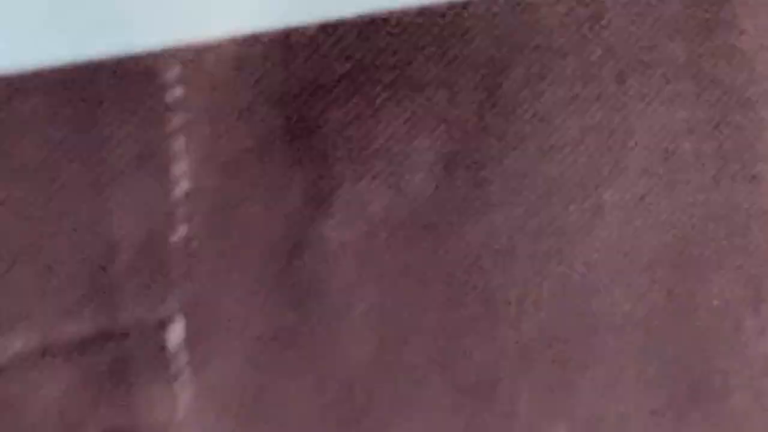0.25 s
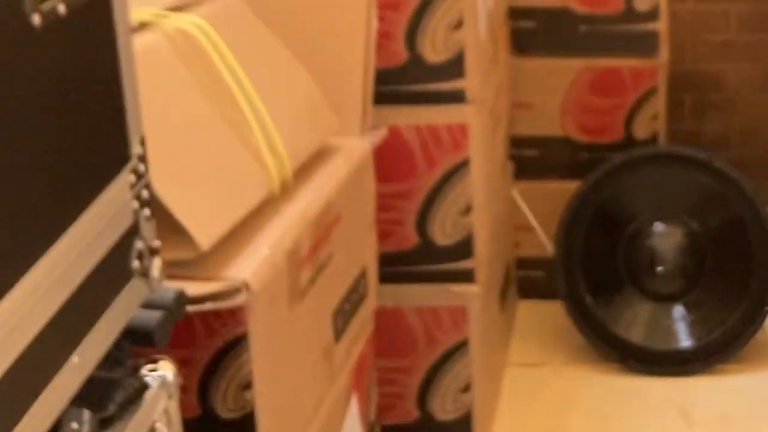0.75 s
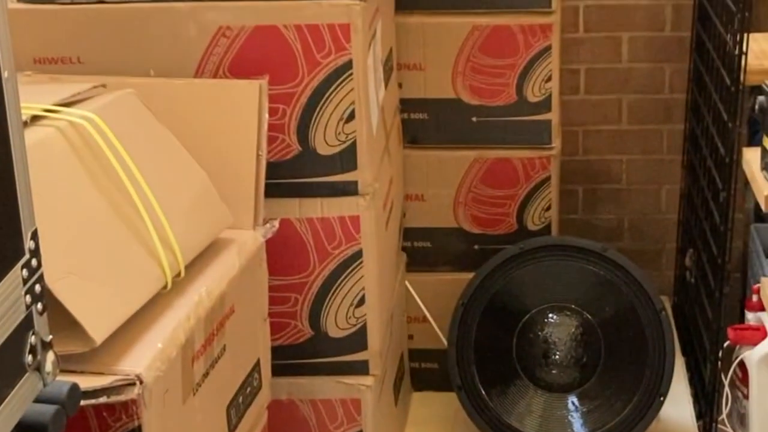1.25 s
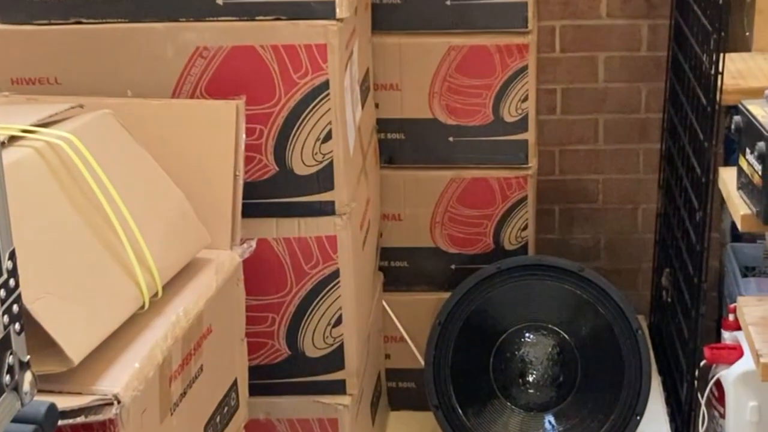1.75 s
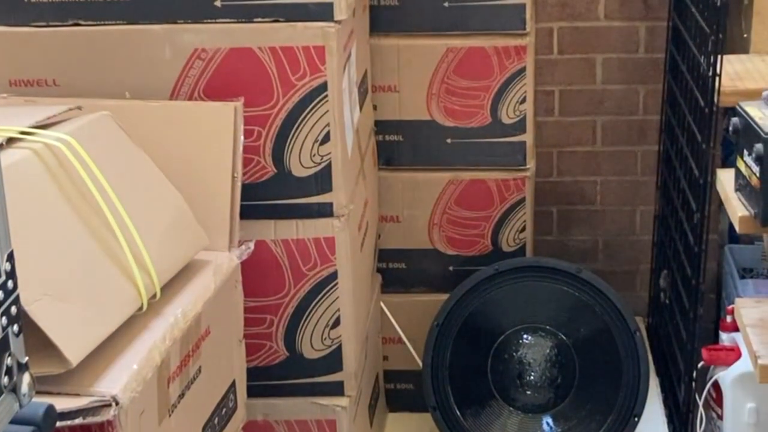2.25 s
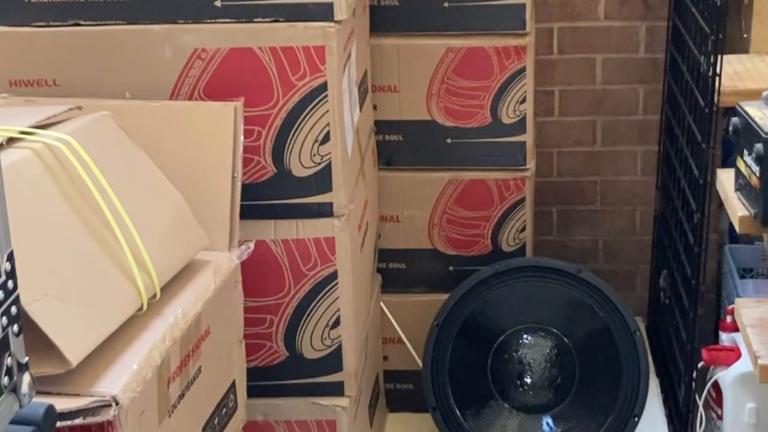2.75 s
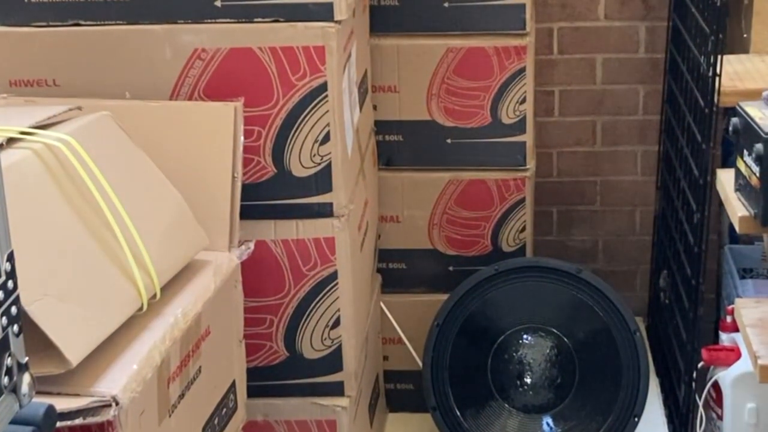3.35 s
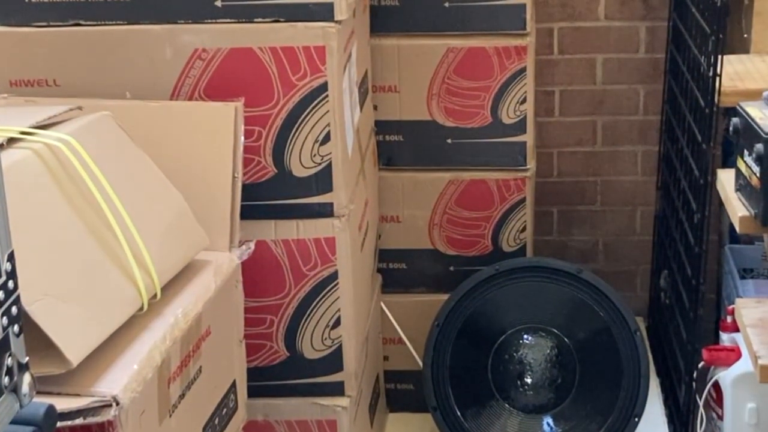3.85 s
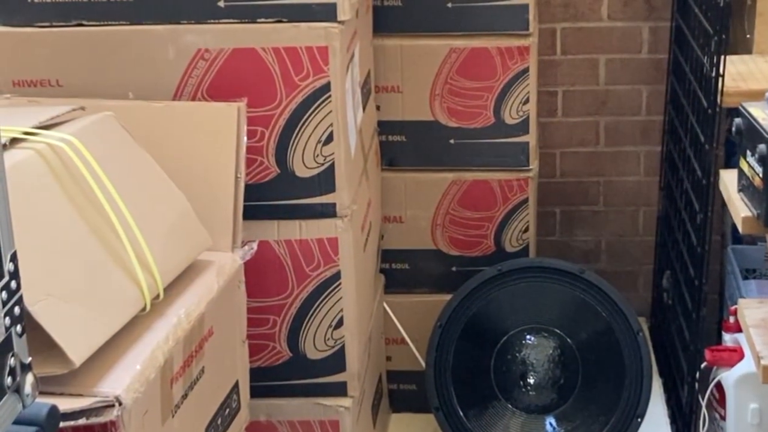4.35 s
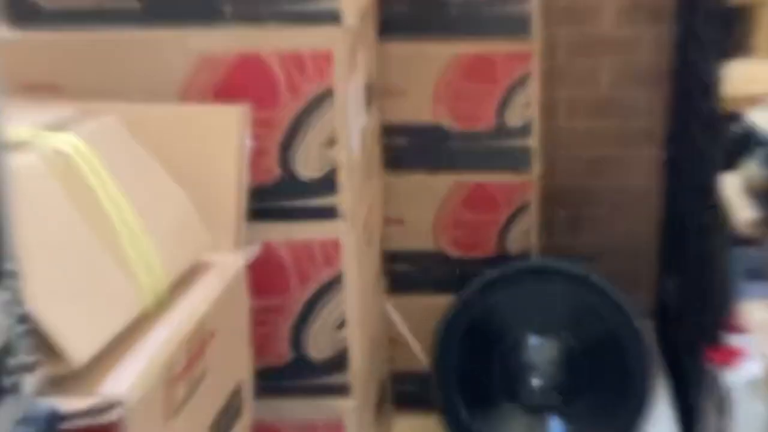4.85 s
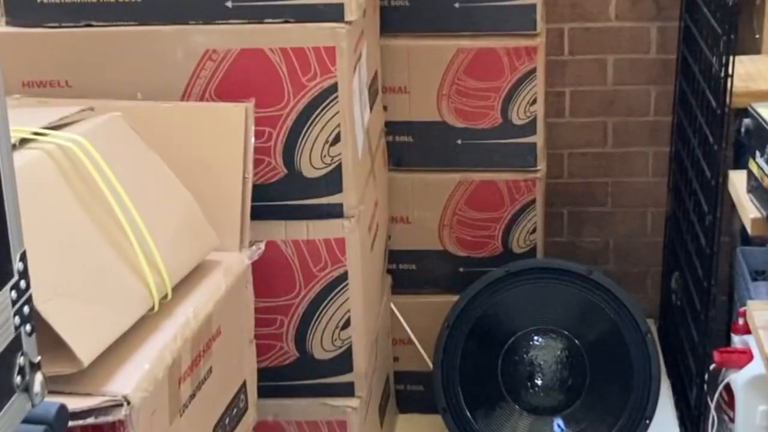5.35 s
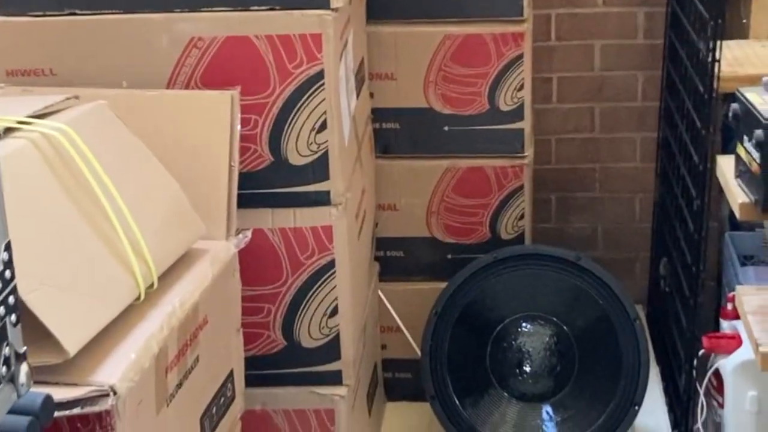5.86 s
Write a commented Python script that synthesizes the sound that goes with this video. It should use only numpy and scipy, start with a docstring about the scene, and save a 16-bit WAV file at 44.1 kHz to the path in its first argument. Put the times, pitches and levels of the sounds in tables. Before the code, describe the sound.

Clothing rubs close to the microphone of a hand-held phone from the start, in uneven swishes with a fine fizz and low drag, over a faint room rumble. At about 0.5 seconds comes a quick cluster of hollow knocks on cardboard boxes, with soft bumps. At 1.3 seconds a hard catch clicks sharply with a brief ring, followed at once by strong, low thumps of the hand on the phone until 1.6 seconds. Rustling, lighter knocks, bumps and small clicks continue and die away by about 3.3 seconds. Then only the quiet rumble and a thin hiss remain. At 4.8 seconds the grip shifts: a short rasp of skin, a few bright, dry ticks from the case and a run of dull thumps that fade by 5.3 seconds. A couple of very faint knocks and clicks come near 6 seconds. The storeroom sounds small, with short echoes.

```python
"""Phone carried through a storeroom

Clothing rubs close to the two microphones of a hand-held phone, over a faint room rumble. The hand
thumps the phone and rocks it, knocks ring hollow among stacked boxes, and a hard catch clicks
sharply. Later the grip shifts with a rasp of skin and a few dry ticks from the case."""
import sys
import numpy as np
from scipy import signal
from scipy.fft import rfft, irfft, next_fast_len
from scipy.io import wavfile
from scipy.ndimage import uniform_filter1d, map_coordinates

SR = 44100
rng = np.random.default_rng(int(sys.argv[2]) if len(sys.argv) > 2 else 0)


def store_pcm(level_fs):
    """Save levels as 16-bit WAV."""
    pcm = np.round(np.clip(level_fs, -1, 1) * 32767).astype(np.int16)
    wavfile.write(sys.argv[1], SR, np.atleast_2d(pcm).T)


N = 268569
T = np.arange(SR * 3 // 4) / SR  # time within one impact, s


def amp(db):
    """Decibels to gain."""
    return 10 ** (np.asarray(db) / 20)


def unit(x):
    """x at rms 1."""
    return x / np.sqrt(np.mean(x ** 2) + 1e-20)


def burst(x, seconds):
    """x with the energy of rms 1 held for this long."""
    return unit(x) * np.sqrt(seconds * SR / x.shape[-1])


def fade(t, t60):
    """Exponential decay, 60 dB in t60."""
    return np.exp(-np.log(1000) * t / t60)


def along(points, hz):
    """(f, value) points interpolated over log frequency."""
    f, v = np.transpose(points)
    return np.interp(np.log(hz + 1), np.log(f + 1), v)


def shape(points):
    """Gain curve through (f/Hz, level/dB) points."""
    return lambda hz: amp(along(points, hz))


def wobble(rate_hz):
    """Smooth random curve, rate_hz knots a second."""
    knots = rng.standard_normal(int(N * rate_hz / SR) + 4)
    return map_coordinates(knots, [np.arange(N) * rate_hz / SR])


def add(track, start_s, x):
    """Mix x into the track."""
    part = track[:, round(start_s * SR):][:, :x.shape[-1]]
    part += x[..., :part.shape[-1]]


def filtered(x, gain):
    """Zero-phase filter with this gain curve."""
    n = x.shape[-1]
    size = next_fast_len(n + SR // 4)
    return irfft(rfft(x, size) * gain(np.fft.rfftfreq(size, 1 / SR)), size)[..., :n]


def coloured(x, gain, size=16384):
    """Minimum-phase filter with this gain curve."""
    cepstrum = irfft(np.log(gain(np.fft.rfftfreq(size, 1 / SR)) + 1e-6))
    cepstrum[1:size // 2] *= 2
    cepstrum[size // 2 + 1:] = 0
    impulse = irfft(np.exp(rfft(cepstrum)))
    return signal.fftconvolve(x, impulse[None], axes=1)[:, :x.shape[1]]


def lagged(x, lag_samples):
    """x at the left microphone, then later at the right."""
    return np.array([x, np.pad(x, (lag_samples, 0))[:len(x)]])


def direct(lag_samples):
    """Unit impulse arriving from the left."""
    return lagged(signal.unit_impulse(len(T)), lag_samples)


# Bearing of cloth and knocks: t/s, side (0 left, 1 right)
BEARING = [(2.0, 0), (2.3, 1)]

def from_side(pair, time_s):
    """Turn a left-leading pair to its bearing at time_s."""
    turn = np.interp(time_s, *np.transpose(BEARING)) * np.pi / 2
    return np.cos(turn) * pair + np.sin(turn) * pair[::-1]


# Diffuse field: f/Hz, left-right correlation
COHERENCE = [(100, .99), (160, .94), (280, .72), (560, .42), (1100, -.25), (2200, -.1), (4500, 0),
             (12000, 0)]

def diffuse(n):
    """Noise at two microphones: alike in the bass, unrelated in the treble."""
    def mid_side_gains(hz):
        turn = np.arccos(np.clip(along(COHERENCE, hz), -1, 1)) / 2
        return np.array([np.cos(turn), np.sin(turn)])

    mid, side = filtered(rng.standard_normal((2, n)), mid_side_gains)
    return np.array([mid + side, mid - side])


# Room decay: f/Hz, t60/s
ROOM_DECAY = [(100, 0.46), (260, 0.2), (700, 0.12), (2000, 0.49), (5000, 0.47), (14000, 0.067)]

def echoes(early_t60_s, late_db):
    """Random room response of energy 1: close walls, then a tail."""
    noise = diffuse(len(T))
    hz, t, spectra = signal.stft(noise, SR, nperseg=256)
    decay = fade(t, along(ROOM_DECAY, hz)[:, None])
    tail = signal.istft(spectra * decay, SR, nperseg=256)[1][:, :len(T)]
    return burst(noise * fade(T, early_t60_s) + amp(late_db) * tail, 1 / SR)


def mode(hz, t60_s, spread_cycles):
    """Decaying sine, its phase scattered between the microphones."""
    cycles = hz * T + rng.random() + rng.normal(0, spread_cycles, (2, 1))
    return fade(T, t60_s) * np.sin(2 * np.pi * cycles)


def mottled(x, depth_db):
    """Lift and shade random time-frequency patches of x."""
    spectra = signal.stft(x, nperseg=512)[2]
    patches = uniform_filter1d(rng.standard_normal(spectra.shape[1:]), size=7, axis=0)
    patches = uniform_filter1d(patches, size=30, axis=1)
    return signal.istft(spectra * amp(depth_db * unit(patches)), nperseg=512)[1][:, :N]


def stroke(start_s, length_s, t60_s, exponent, rise_share=0.33):
    """Envelope of one rub, speed ** exponent: it speeds up, slides on and dies away."""
    t = np.arange(N) / SR - start_s
    speed = np.sin(np.pi / 2 * np.clip(t / (rise_share * length_s), 0, 1)) ** 2
    return speed ** exponent * fade(np.maximum(t - length_s, 0), t60_s)


# Cloth strokes: t/s, length/s, release t60/s, swish level/dB, fizz level/dB, drag level/dB
STROKES = [(-0.18, 0.36, 0.45, -58.5, -64, -56), (0.16, 0.22, 0.97, -70, -74.5, -60),
           (0.448, 0.1, 0.3, -58, -71.5, -46.5), (0.586, 0.096, 0.33, -59.5, -67, -46),
           (0.926, 0.42, .4, -77, -76.5, -75.5), (1.068, 0.4, 0.27, -64, -59.5, -64),
           (1.265, .15, 0.13, -53.5, -56.5, -49), (1.424, 0.07, 0.52, -59, -63.5, -50),
           (1.515, 0.47, 0.64, -65, -66.5, -61.5), (1.804, 0.15, 0.23, -60, -61, -63),
           (1.983, 0.13, 0.33, -75, -88, -60.5), (2.254, 0.1, 0.47, -69.5, -74.5, -52),
           (2.395, 0.037, 0.34, -60, -65, -65), (2.415, 0.31, 0.57, -72.5, -91, -60),
           (2.75, 0.042, 0.3, -57.5, -66.5, -47.5), (2.788, 0.13, 0.48, -71, -97, -56.5),
           (2.968, 0.18, 0.27, -64, -78.5, -66.5), (3.046, 0.245, 0.24, -62.5, -74.5, -66)]
# Friction spectra: f/Hz, level/dB
SWISH_SPECTRUM = [(150, -1.5), (500, 1), (1000, 4), (1700, 11.5), (2500, 9), (3400, 5), (4500, 5),
                  (5600, 1), (7500, 3.5), (11000, -28.5), (15500, -23.5), (17000, -33.5)]
FIZZ_SPECTRUM = [(3000, -30), (7000, -10), (11000, 4.5), (15500, -7), (17000, -31)]
DRAG_SPECTRUM = [(30, -5.5), (70, 7.5), (130, -10), (205, 2.5), (260, -5), (370, -0.5), (520, -8.5),
                 (750, -8.5), (1200, -12), (2500, -47.5)]
CARDBOARD_SPECTRUM = [(150, -20), (280, -5.5), (355, 2), (450, -5.5), (510, -3.5), (620, -19.5),
                      (740, -14.5), (950, -21.5), (2000, -47)]

def cloth(grain_db=1.5, near_db=-3, fizz_near_db=4):
    """Fabric slides on fabric with a swish, fine fizz and low drag; once it brushes hollow cardboard."""
    starts, lengths, releases, swish_db, fizz_db, drag_db = np.transpose(STROKES)

    def rubbing(levels_db, exponent):
        """Envelope of all strokes, summed in power."""
        rows = zip(levels_db, starts, lengths, releases)
        return np.sqrt(sum((amp(db) * stroke(*timing, exponent)) ** 2 for db, *timing in rows))

    def fibres(spectrum, fine=False):
        """Catching threads, direct plus diffuse; the finest come from the right."""
        near = lagged(rng.standard_normal(N), lag_samples=12)
        if fine:
            near = amp(fizz_near_db) * near[::-1]
        else:
            near = amp(near_db) * from_side(near, np.arange(N) / SR)
        grainy = (diffuse(N) + near) * amp(grain_db * wobble(1000))
        return unit(coloured(grainy, shape(spectrum)))

    swish = rubbing(swish_db, exponent=0.55) * amp(wobble(26))
    swish = swish * mottled(fibres(SWISH_SPECTRUM), depth_db=2.6)  # shifting folds
    fizz = rubbing(fizz_db, exponent=0.75) * amp(0.33 * wobble(22)) * fibres(FIZZ_SPECTRUM, fine=True)
    drag = rubbing(drag_db, exponent=0.5) * amp(1.5 * wobble(25)) * fibres(DRAG_SPECTRUM)
    brush = amp(-55.5) * stroke(start_s=-0.042, length_s=0.29, t60_s=0.32, exponent=0.5)
    return swish + fizz + drag + brush * fibres(CARDBOARD_SPECTRUM)


# Building rumble: f/Hz, level/dB
RUMBLE_SPECTRUM = [(20, -17), (48, -1), (70, 0), (125, -6), (165, -4), (210, -6), (270, -11.5), (380, -12),
                   (520, -15.5), (800, -20.5), (1300, -24.5), (2500, -27.5), (5000, -32.5), (16000, -48)]

def room_tone(rumble_db=-69, hiss_db=-87):
    """Faint, unsteady rumble of the building and a thin hiss."""
    rumble_gain = amp(rumble_db + 1.3 * wobble(7))
    rumble = mottled(coloured(diffuse(N), shape(RUMBLE_SPECTRUM)), depth_db=1.8)
    hiss = coloured(diffuse(N), shape([(3000, -20), (8000, -1), (11500, 0), (16000, -14)]))
    return rumble_gain * unit(rumble) + amp(hiss_db) * unit(hiss)


# Hand on phone: t/s, level/dB, swing f/Hz, relative body ring/dB
THUMPS = [(0.148, -56, 82, -20), (0.562, -38, 81, -18), (0.604, -39.5, 81.5, -20), (1.3125, -26, 82, -26),
          (1.385, -28.5, 80, -14), (1.502, -27, 84.3, -15.5), (1.56, -37, 82, -22), (1.932, -47, 83, -3),
          (2.012, -45, 81, -3), (2.462, -47, 80, -14), (2.492, -46, 82, -14), (2.763, -41, 86.5, -22),
          (2.874, -47.5, 82.9, -32), (4.798, -31, 79.5, -8), (4.831, -34.5, 79.6, -12),
          (4.862, -38, 79.5, -23.5), (4.922, -46, 85, -19), (5.001, -48.5, 80, -14.5),
          (5.311, -53, 77.8, -25.5)]
# Low shudder of a thump: f/Hz, level/dB
SHUDDER_SPECTRUM = [(25, -32), (60, 0.5), (100, -3.5), (200, -17), (500, -43.5), (1500, -81.5)]

def thumps(rebounds=3, rebound_s=0.05, loss_db=8.5, grip_scatter=0.024, body_hz=276):
    """A soft push rocks the phone in the hand, with ever weaker rebounds; its body hums briefly."""
    out = np.zeros((2, N))
    push = 1 - np.exp(-(T / 0.008) ** 2)
    swing = push * fade(T, 0.075)
    for start_s, db, swing_hz, ring_db in THUMPS:
        for k in range(1 + rebounds):
            hz = swing_hz * np.exp(grip_scatter * rng.standard_normal())  # grip firmness varies
            rock = swing / swing.max() * np.sin(2 * np.pi * hz * T)
            add(out, start_s + k * rebound_s, amp(db - k * loss_db) * rock)
        shudder = coloured(echoes(early_t60_s=0.14, late_db=-11), shape(SHUDDER_SPECTRUM))
        ring = push * fade(T, 0.2) * np.sin(2 * np.pi * (body_hz * T + rng.random()))
        add(out, start_s, amp(db) * (burst(shudder, 0.0012) + amp(ring_db) * ring))
    return out


def contact_band(centre_hz, above_oct=0.58, below_oct=1.3):
    """Gain curve of a soft blow: little lies far above its centre frequency."""
    def gain(hz):
        octaves = np.log2((hz + 1) / centre_hz)
        return np.exp(-0.5 * (octaves / np.where(hz > centre_hz, above_oct, below_oct)) ** 2)

    return gain


# Blows on boxes: t/s, level/dB, centre f/Hz, relative boom/dB, relative edge/dB, left minus right/dB
KNOCKS = [(0.407, -57, 1020, -3, -13, -3), (0.4548, -30.5, 556, -8.5, -23, -0.5),
          (0.4614, -39, 462, 13.5, -26, -2), (0.4705, -37, 606, -1.5, -25, -1),
          (0.554, -35, 1110, -9, -2.5, -2), (0.561, -35, 570, 7.5, -8, 2), (0.627, -44.5, 925, -4, -14, -2),
          (1.368, -42, 443, 2.5, -11, -2), (1.482, -38.5, 420, -0.5, -24, -0.5),
          (1.496, -46.5, 905, 13.5, -14.5, -1), (1.550, -45, 380, -1, -42, 0),
          (1.920, -41, 350, -4, -15, -1.5), (1.932, -44, 400, 0, -12, -1.5),
          (2.0069, -46.5, 395, 9.5, -12, -2.5), (2.266, -37, 360, -3, -27, -1),
          (2.389, -52, 535, -2, -9.5, -3.5), (2.513, -50, 665, 5.5, -12, -4.5),
          (2.735, -36, 520, -3, -16, -1), (2.763, -47.5, 477, 3, -23, -5),
          (2.865, -52.5, 570, 0.5, -9.5, -5), (3.163, -56, 504, -7, -26, -3),
          (3.5396, -79, 329, 2, -13.5, -3), (4.784, -44, 352, -3.5, -16, -1.5),
          (5.932, -64.5, 288, 8, -11, -1.5), (6.059, -64, 300, 8.5, -12.5, 0.5)]
# Box resonances: f/Hz, level/dB, t60/s
BOX_MODES = [(158, 0, .14), (210, -3, .2), (300, -11, .1), (368, -2, .18), (415, -7, .13), (510, -2, .2),
             (575, -5, .2), (646, -4, .22), (716, 0, .18), (857, -11, .15), (923, -8, .25), (1061, -5, .23),
             (1268, -8, .22), (1410, -11, .22), (1667, -9, .22), (1771, -10, .22), (1977, -10, .2),
             (2402, -12, .2), (2727, -13, .2)]
# Spectra of the boom, the hard edge and its ring: f/Hz, level/dB
BOOM_SPECTRUM = [(40, -29), (90, -3.5), (155, -2.5), (215, -3), (290, -21), (600, -94)]
EDGE_SPECTRUM = [(500, -67), (1000, 11.5), (1600, 5), (2400, -3), (3300, -12.5), (4500, -16), (8000, -51.5),
                 (16000, -37.5)]
EDGE_RING_SPECTRUM = [(600, -50), (1000, -8), (1300, 0), (1800, -3), (2400, -9), (3200, -20)]

def knocks(contact_cycles=0.57, wall_hz=156, grit_per_s=650, grit_db=-9.5):
    """Each blow flexes a box wall, rings the hollow boxes and, if hard, adds a bright, gritty edge."""
    out = np.zeros((2, N))
    flex_decay = fade(T, 0.022) + amp(-21.5) * fade(T, 0.17)
    flex = (1 - np.exp(-T / 0.003)) ** 2 * flex_decay * np.sin(2 * np.pi * wall_hz * T)
    for start_s, db, centre_hz, boom_db, edge_db, pan_db in KNOCKS:
        rise_s = contact_cycles / centre_hz  # a dull, yielding contact builds slowly
        build = 1 - np.exp(-T / rise_s)
        straight = 0.75 * from_side(direct(lag_samples=13), start_s) * np.exp(-rise_s / 0.0012)
        blow = straight + echoes(early_t60_s=0.015, late_db=2.5) * build
        ring = sum(amp(mode_db + rng.normal(0, 1.5)) * mode(hz, t60_s, spread_cycles=hz / 3500)
                   for hz, mode_db, t60_s in BOX_MODES)
        ring = unit(ring * build)
        contact = contact_band(centre_hz)
        body = burst(unit(coloured(ring, contact)) + amp(0.5) * unit(coloured(blow, contact)), 0.021)
        boom = burst(unit(flex) + amp(-5) * unit(coloured(blow, shape(BOOM_SPECTRUM))), 0.010)
        crunches = rng.standard_normal((2, len(T))) * (rng.random(len(T)) < grit_per_s / SR)
        grit = burst(crunches * fade(T, 0.3), 1 / SR)
        edge_noise = unit(coloured(blow + amp(grit_db) * grit, shape(EDGE_SPECTRUM)))
        edge_ring = unit(coloured(ring, shape(EDGE_RING_SPECTRUM)))
        edge = burst(edge_noise + amp(-5) * edge_ring, 0.074)
        pan = amp(pan_db * np.array([[0.5], [-0.5]]))
        add(out, start_s, amp(db) * (pan * (body + amp(edge_db) * edge) + amp(boom_db) * boom))
    return out


# Snaps of the catch and small loose things: t/s, level/dB, brightness/dB
CLICKS = [(0.5557, -42, -30), (0.626, -44, -18), (1.2847, -24.7, -8.5), (1.2960, -33, -22),
          (1.8409, -45.5, -27), (1.858, -44.5, -24.5), (1.877, -48.5, -29), (1.933, -47, -7),
          (2.0088, -49.5, -29), (2.4064, -52.5, 2.5), (2.862, -54, -42), (4.7804, -54, -25),
          (4.789, -53, -6), (5.907, -62, -21), (5.936, -65, -10)]
# Crack of a snap: f/Hz, level/dB
CRACK_SPECTRUM = [(200, -20), (1000, -7.5), (1700, -4.5), (2400, 2.5), (3300, -5.5), (4100, -1.5),
                  (5200, -9), (7000, -9), (11500, -14.5), (16000, -30)]
# Catch resonances: f/Hz, level/dB, t60/s
CATCH_MODES = [(2040, -14, .13), (2162, -10, .16), (2251, -12, .13), (2346, -2, .17), (2450, -7, .06),
               (2580, -6, .16), (2647, -4, .17), (2746, -10, .13), (2842, -4, .19), (3193, -11, .14),
               (3365, -13, .16), (3973, -11, .17), (4231, -11, .12), (5023, -16, .13), (6918, -15, .11)]

def clicks(room_db=1.5, ring_db=-2.5, ring_db_per_db=0.9):
    """A hard snap: a brief crack, its echoes, and modes that ring more the stronger it is."""
    out = np.zeros((2, N))
    strongest_db = max(row[1] for row in CLICKS)
    for start_s, db, bright_db in CLICKS:
        snap = 0.5 * direct(lag_samples=17) + burst(diffuse(len(T)) * fade(T, 0.0094), 0.5 / SR)
        snap += amp(room_db) * echoes(early_t60_s=0.043, late_db=-9)
        tilt = shape([(3000, 0.038), (8000, bright_db + 16.5)])
        crack = coloured(snap, lambda hz: shape(CRACK_SPECTRUM)(hz) * tilt(hz))
        ring = sum(amp(mode_db) * mode(hz, t60_s, spread_cycles=0.09)
                   for hz, mode_db, t60_s in CATCH_MODES)
        ring_gain = amp(ring_db + ring_db_per_db * (db - strongest_db))
        add(out, start_s, amp(db) * burst(unit(crack) + ring_gain * unit(ring), 0.0062))
    return out


# Skin on the case: f/Hz, level/dB
SKIN_SPECTRUM = [(300, 3), (1000, -1), (2400, -5), (4300, -6), (7000, -11), (12000, -13), (16000, -20)]

def regrip(level_db=-61, grain_db=3, near_db=-2):
    """Fingers slide to a new hold with a short, grainy rasp."""
    friction = diffuse(N) + amp(near_db) * lagged(rng.standard_normal(N), lag_samples=12)[::-1]
    rasp = unit(coloured(friction * amp(grain_db * wobble(700)), shape(SKIN_SPECTRUM)))
    return amp(level_db) * stroke(start_s=4.779, length_s=0.04, t60_s=0.4, exponent=0.55) * rasp


# Slips of the case: t/s, level/dB
TICKS = [(4.8025, -34), (4.8135, -37.5), (4.847, -73.5), (4.8853, -58), (4.8911, -63)]
# Spectrum of the dry, bright ticks: f/Hz, level/dB
TICK_SPECTRUM = [(500, -9), (2500, -17), (3700, -13), (5000, -2.5), (6800, 8), (8800, -4), (11000, 2.5),
                 (13500, -4), (15500, -3), (17000, -8)]

def case_ticks():
    """The case slips under the fingers, so close that it sounds dry."""
    out = np.zeros((2, N))
    decay = fade(T, 0.003) + amp(-34) * fade(T, 0.03) + amp(-52) * fade(T, 0.3)
    envelope = (1 - np.exp(-T / 0.0003)) * decay
    for start_s, db in TICKS:
        slip = lagged(rng.standard_normal(len(T)) * envelope, lag_samples=12)[::-1]
        add(out, start_s, amp(db) * burst(coloured(slip, shape(TICK_SPECTRUM)), 0.0077))
    return out


def scene():
    """Everything that reaches the two microphones."""
    return knocks() + thumps() + clicks() + case_ticks() + cloth() + room_tone() + regrip()


# Microphone port imbalance: f/Hz, left minus right/dB
PORT_IMBALANCE = [(100, -1.5), (170, -1.5), (330, 3), (700, 2), (2500, 3), (9000, 0.2)]
BAND_LIMIT_HZ = 16400

def record(dry):
    """The two ports differ a little in colour; nothing passes above the band limit."""
    def port_gains(hz):
        return amp(np.outer([0.5, -0.5], along(PORT_IMBALANCE, hz))) * (hz < BAND_LIMIT_HZ)

    return filtered(dry, port_gains)


dry = scene()
out = record(dry)
store_pcm(out)
```